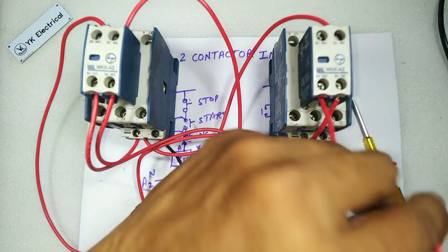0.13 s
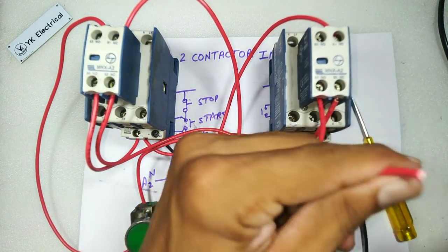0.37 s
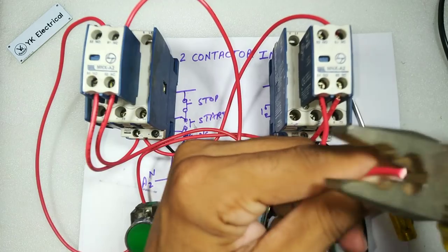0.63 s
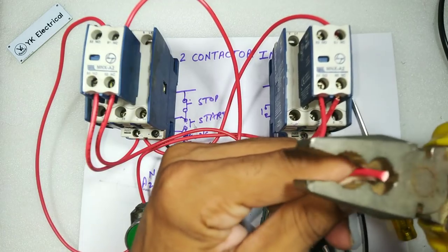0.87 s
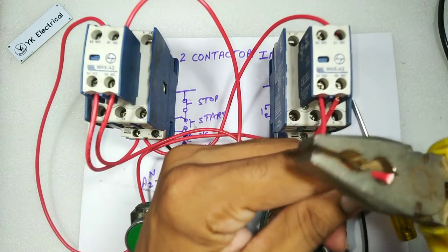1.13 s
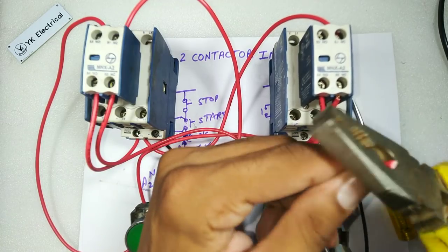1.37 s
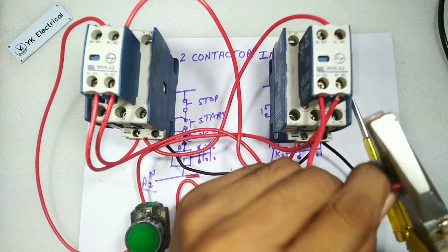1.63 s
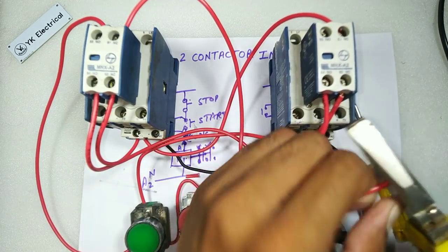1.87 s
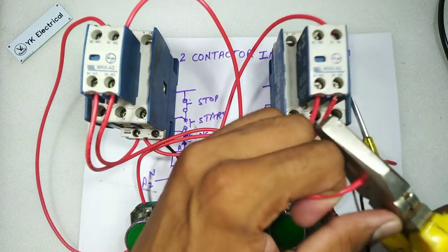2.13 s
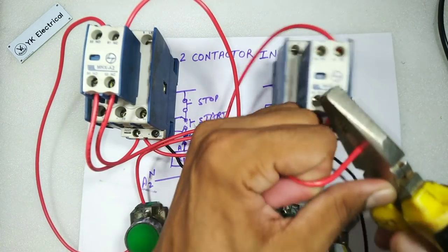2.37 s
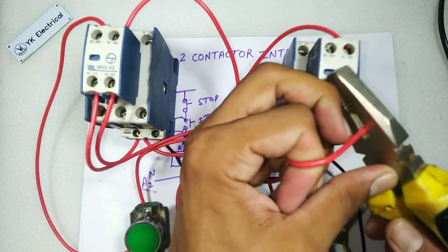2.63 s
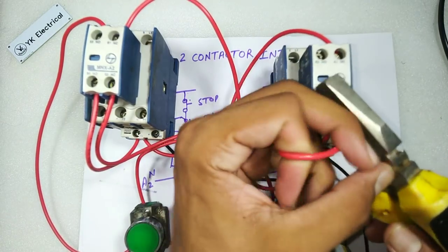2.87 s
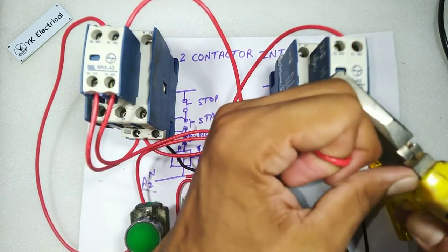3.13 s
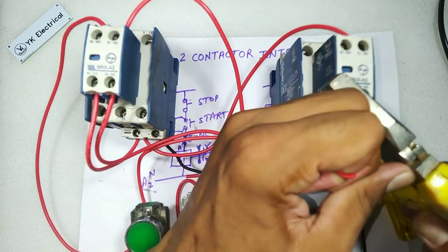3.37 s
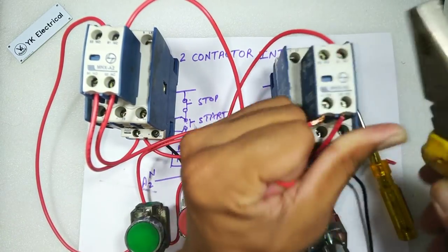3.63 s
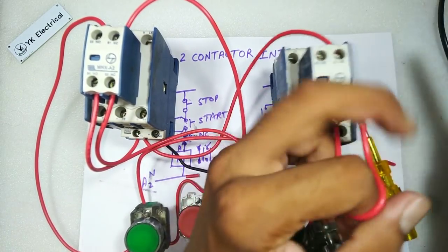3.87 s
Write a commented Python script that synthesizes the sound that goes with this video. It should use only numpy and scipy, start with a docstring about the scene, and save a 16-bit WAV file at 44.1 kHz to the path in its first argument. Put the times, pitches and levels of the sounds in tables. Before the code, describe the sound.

Pliers strip a wire at a table: soft rubbing and small plastic taps build, then a brief creak and one loud steel snap, followed by light clicks. Close stereo microphones, small humming room.

```python
"""Pliers strip a wire close to a pair of microphones: the sleeve creaks, tears off and the jaws snap shut.
The creak is a train of uneven slips, the tear is a burst of grains and noise, and the jaws ring as steel.
A plastic block rubs over paper as showers of tiny impacts and rings when knocked; the table shakes in low modes.
Behind it are room echoes, shaped noise for the quiet air, wavering hum tones and a far cricket of throbbing noise."""
import sys
import numpy as np
from scipy import signal
from scipy.fft import rfft, irfft
from scipy.io import wavfile
from scipy.ndimage import uniform_filter1d

SR = 44100
rng = np.random.default_rng(int(sys.argv[2]) if len(sys.argv) > 2 else 0)


def to_wav(s):
    """Save 16-bit WAV."""
    ch = np.atleast_2d(s).T  # columns
    pcm = np.round(np.clip(ch, -1, 1) * 32767)  # PCM
    wavfile.write(sys.argv[1], SR, pcm.astype(np.int16))


def linear_from_db(decibels):
    """Turn decibels (scalar or array-like) into linear amplitude factors; 0 gives 1."""
    return 10 ** (np.asarray(decibels, float) / 20)


N = 176400  # length of the scene [samples]

# sleeve creaking under load: (time [s], slip rate [1/s], level [dB])
CREAK_PATH = [(3.40, 530, -82), (3.415, 480, -55), (3.445, 480, -57.5), (3.468, 556, -49), (3.51, 585, -53),
              (3.61, 560, -68.5)]
# resonances that follow the creak: (multiple of the slip rate [1], width [Hz], relative level [dB])
CREAK_MODES = [(1.15, 400, -4), (2, 200, -2), (3.95, 300, -1), (4.7, 500, -7)]
# colour of the tearing sleeve: (frequency [Hz], relative level per Hz [dB])
TEAR_COLOUR = [(300, -19), (1400, -29), (3700, -8), (7500, -54), (11000, -17), (16000, -40)]
# contacts of the steel jaws: (time [s], level [dB], brightest pitch [Hz])
JAW_CONTACTS = [(.281, -26.5, 5960), (2.371, -27, 5500), (3.6115, -22, 1500), (3.6125, -2, 3000),
                (3.6185, -15, 880), (3.6201, -2, 1400), (3.6212, 1, 2200), (3.6232, 0, 3600),
                (3.6205, -13, 10500), (3.6243, -9, 5600), (3.6285, -11, 2900), (3.637, -16, 1500),
                (3.641, -9, 3700), (3.658, -30, 3000), (3.753, -24, 3300), (3.822, -23.5, 3280),
                (3.8225, -22.5, 11700), (3.867, -21.5, 9700), (3.871, -23.5, 4460), (3.917, -25, 9000)]
# ringing modes of the pliers: (frequency [Hz])
PLIERS_MODES = [750, 915, 1290, 1480, 1850, 2200, 2480, 2730, 3375, 3790, 4600, 5600, 6500, 9000, 11000,
                14000]
# strokes of the block and wires over paper:
# (start [s], length [s], pressure level [dB], paper hiss relative to it [dB])
STROKES = [(0.187, 0.23, -66.5, -11), (1.811, 0.09, -59.5, -18), (2.282, 0.11, -56.5, -16),
           (2.384, 0.045, -58, -12), (2.416, 0.079, -49.5, -13), (2.479, 0.041, -47.5, -13),
           (2.549, 0.063, -51, -14), (2.612, 0.13, -51, -10.5), (2.692, 0.14, -45.5, -12.5),
           (2.817, 0.094, -54, -17), (2.938, 0.1, -57, -13), (3.01, 0.24, -62.5, -13),
           (3.629, 0.16, -50, -12), (3.763, 0.24, -53, -10)]
# colour of the rubbing heard through the block: (frequency [Hz], relative level per Hz [dB])
BLOCK_COLOUR = [(300, -0.5), (950, 0), (1300, -5), (1900, -2.5), (4000, -3), (8500, -24)]
# colour of the paper hiss: (frequency [Hz], relative level per Hz [dB])
PAPER_COLOUR = [(7500, -31), (10000, -4), (12000, -6), (16000, -12)]
# knocks of the plastic block: (time [s], level [dB], brightest pitch [Hz])
BLOCK_KNOCKS = [(.218, -35, 1360), (1.835, -36, 1270), (1.856, -35, 1270), (1.866, -39, 1510),
                (2.196, -39, 1330), (2.399, -28, 1460), (2.459, -29, 3950), (2.503, -29.5, 3630),
                (2.575, -37.5, 906), (3.074, -36, 1400), (3.272, -38, 930), (3.848, -33, 1400),
                (3.88, -34, 730), (3.94, -39, 1350), (3.98, -39, 1360)]
# ringing modes of the block: (frequency [Hz])
BLOCK_MODES = [730, 880, 1270, 1510, 3000, 4320]
# table shaken by the hands: (time [s], level [dB])
TABLE_SHAKE = [(0, -53.5), (1.9, -65), (2.45, -51.5), (2.6, -45), (3.25, -45.5), (3.5, -57.5), (3.61, -47),
               (3.64, -35.5), (3.8, -41), (4, -51.5)]
# low modes of the table: (frequency [Hz], width [Hz], relative level [dB])
TABLE_MODES = [(60.5, 40, -0.5), (81.8, 16.4, -2), (206.4, 44, -13)]
# how fast the room's echo dies: (frequency [Hz], time to fall 60 dB [s])
ECHO_DECAY = [(200, 0.82), (1000, 0.36), (5000, 0.41), (12000, 0.33)]
# wavering hum tones: (frequency [Hz], level [dB], width of the wavering part [Hz])
HUM_TONES = [(100.9, -51.5, 4.7), (171.4, -57.5, 0.55)]
# colour of the room noise: (frequency [Hz], relative level per Hz [dB])
AIR_COLOUR = [(35, -24), (75, 0.5), (130, -7.5), (200, -7.5), (270, -17), (520, -21.5), (700, -27),
              (4000, -36), (7500, -45), (10500, -42), (16000, -42)]
# how alike the room noise is left and right: (frequency [Hz], likeness [0 to 1])
AIR_LIKENESS = [(200, 0.87), (950, 0), (2000, 0)]


def evened(x):
    """Scales a signal to an average strength (rms) of 1."""
    return x / np.sqrt(np.mean(x ** 2) + 1e-20)


def read(points, hz):
    """Reads a frequency table between its points, on a logarithmic pitch axis."""
    f, value = np.transpose(points)
    return np.interp(np.log(hz + 1), np.log(f + 1), value)


def curve(rows, col, outside):
    """Spreads one column of a table along the whole time axis."""
    rows = np.array(rows)
    return np.interp(np.arange(N) / SR, rows[:, 0], rows[:, col], outside, outside)


def hump(start_s, length_s):
    """Progress through an event: 0 before it, rising to 1 at its end."""
    return np.clip((np.arange(N) / SR - start_s) / length_s, 0, 1)


def colour(x, points):
    """Shapes a spectrum, silent beyond the ends of the table, and evens it to rms 1."""
    hz = np.fft.rfftfreq(x.shape[-1], 1 / SR)
    inside = (hz > points[0][0]) * (hz < points[-1][0])
    return evened(irfft(rfft(x) * linear_from_db(read(points, hz)) * inside, x.shape[-1]))


def resonate(x, hz, width_hz):
    """A resonance of gain 1, fixed or moving: shift its pitch to zero, smooth, shift back."""
    turn = np.exp(2j * np.pi * np.cumsum(hz * np.ones(N)) / SR)
    r = np.exp(-np.pi * width_hz / SR)
    return 2 * (turn * signal.lfilter([1 - r], [1, -r], x / turn)).real


def resonate_twice(x, hz, width_hz):
    """Two equal resonances in a row leave a narrower band."""
    return resonate(resonate(x, hz, width_hz), hz, width_hz)


def grains():
    """Sliding contact: dense tiny impacts of uneven size at random moments."""
    grains_per_s, spread_db = 6000, 4.5
    size = linear_from_db(spread_db * np.minimum(rng.exponential(1, N), 3)) * rng.standard_normal(N)
    return size * (rng.random(N) < grains_per_s / SR)


def creak():
    """The sleeve sticks and slips unevenly; resonances at multiples of the slip rate sound."""
    jitter, noise_amount = 0.07, 1.1
    pace = curve(CREAK_PATH, 1, 500)
    rate = pace * (1 + jitter * evened(uniform_filter1d(rng.standard_normal(N), 150)))
    slips = np.diff(np.floor(np.cumsum(rate) / SR), prepend=0)  # one click per finished cycle
    slips = slips * linear_from_db(3.3 * rng.standard_normal(N))
    drive = evened(slips - slips.mean()) + noise_amount * rng.standard_normal(N)
    sound = sum(linear_from_db(db) * resonate_twice(drive, k * pace, w) for k, w, db in CREAK_MODES)
    return linear_from_db(curve(CREAK_PATH, 2, -120)) * evened(sound)


def tear():
    """The sleeve scrapes through the jaws as it tears: a short rasp of grains and noise."""
    start_s, length_s, level_db = 3.6105, 0.034, -33
    t = np.arange(N) / SR - start_s
    rasp = np.clip(t / 0.0022, 0, 1) * np.clip((length_s - t) / 0.0028, 0, 1)
    return linear_from_db(level_db) * rasp * colour(evened(grains()) + rng.standard_normal(N), TEAR_COLOUR)


def blows(rows, modes, q, contact_s):
    """Each blow rings the modes nearest its brightest pitch and starts with a short crack."""
    focus_db_per_oct2 = -24  # modes weaken with squared distance in octaves
    crack_db, crack_s, crack_db_per_oct = -15, 0.0015, -9
    out, t = np.zeros(N + 2048), np.arange(2048) / SR
    hz = np.array(modes)[:, None]
    all_hz = np.fft.rfftfreq(2048, 1 / SR) + 1
    for s, level_db, top_hz in rows:
        detune, noise = rng.standard_normal((len(modes), 1)), rng.standard_normal(2048)
        strength = linear_from_db(focus_db_per_oct2 * np.log2(hz / top_hz) ** 2)
        decay = np.exp(-np.pi * hz / q * t)
        ring = (strength * decay * np.sin(2 * np.pi * hz * (1 + 0.0028 * detune) * t)).sum(0)
        crack_colour = linear_from_db(crack_db_per_oct * abs(np.log2(all_hz / top_hz)))
        crack = evened(irfft(rfft(noise) * crack_colour)) * np.exp(-t / crack_s)
        blow = ring / abs(ring).max() + linear_from_db(crack_db) * crack
        blow *= 1 - np.exp(-t / contact_s)  # a softer contact starts more slowly
        at = round(s * SR)
        out[at:at + len(blow)] += linear_from_db(level_db) * blow
    return out[:N]


def jaws():
    """Hard steel contacts ring the many modes of the pliers; q is pitch over width of a mode."""
    return blows(JAW_CONTACTS, PLIERS_MODES, q=9, contact_s=0.0003)


def knocks():
    """Softer plastic contacts ring the few modes of the block."""
    return blows(BLOCK_KNOCKS, BLOCK_MODES, q=14, contact_s=0.0007)


def squeak():
    """A thin squeak: sliding grains through one narrow high resonance."""
    start_s, length_s, hz, level_db = 2.64, 0.17, 11460, -57
    swell = np.sin(np.pi * hump(start_s, length_s))
    return linear_from_db(level_db) * swell * evened(resonate_twice(grains(), hz, 500))


def drag():
    """Rubbing: friction grains through the block plus paper hiss, swelling and fading with each stroke."""
    catch_db, scrape_hz, scrape_db = 3.5, 1400, -3
    pressure, hiss = np.zeros(N), np.zeros(N)
    for start_s, length_s, db, hiss_db in STROKES:
        stroke = linear_from_db(db) * np.sin(np.pi * hump(start_s, length_s) ** 1.13) ** 0.85
        pressure += stroke
        hiss += stroke * linear_from_db(hiss_db)
    # the block catches unevenly; its hollow rings at a wandering pitch
    catch = evened(uniform_filter1d(rng.standard_normal(N), 200))
    wander = evened(uniform_filter1d(rng.standard_normal(N), 4000))
    rubbing = grains()
    hollow = evened(resonate(rubbing, scrape_hz * (1 + 0.071 * wander), 350))
    body = colour(rubbing, BLOCK_COLOUR) + linear_from_db(scrape_db) * hollow
    return squeak() + pressure * evened(linear_from_db(catch_db * catch) * body) + hiss * colour(grains(), PAPER_COLOUR)


def table():
    """Hands stir the low modes of the table with noise; a decaying low tone thumps as the jaws close."""
    thump_s, thump_db, thump_hz, thump_t60_s = 3.6275, -28, 85, 0.11
    push = rng.standard_normal((2, N))
    push = push[0] + 0.5 * push[1] * np.array([[1], [-1]])  # partly shared by left and right
    low = sum(linear_from_db(db) * resonate_twice(push, hz, w) for hz, w, db in TABLE_MODES)
    t = np.maximum(np.arange(N) / SR - thump_s, 0)
    thump = linear_from_db(thump_db - 60 * t / thump_t60_s) * np.sin(-2 * np.pi * thump_hz * t)
    thump *= np.minimum(t / 0.0021, 1)  # soft start
    return linear_from_db(curve(TABLE_SHAKE, 1, -60)) * evened(low) + thump


def room(x):
    """Sparse echoes of random sign: quick ones from the table and a tail dying band by band."""
    tail_db, early_db, early_t60_s = -8.5, -12, 0.05
    taps = np.zeros((2, SR))
    at = np.arange(60, SR - 20, 20) + rng.integers(0, 20, (2, (SR - 61) // 20))
    np.put_along_axis(taps, at, rng.choice([-1., 1.], at.shape), 1)
    early = taps * linear_from_db(-60 * np.arange(SR) / SR / early_t60_s)
    hz, t, z = signal.stft(taps, SR, nperseg=256)
    z = z * linear_from_db(-60 * t / read(ECHO_DECAY, hz)[:, None])
    tail = signal.istft(z, SR, nperseg=256)[1][:, :SR]
    echoes = linear_from_db(tail_db) * tail / np.linalg.norm(tail[0])
    echoes += linear_from_db(early_db) * early / np.linalg.norm(early[0])
    return signal.fftconvolve(x[None], echoes, axes=1)[:, :N]


def hum():
    """Steady tones mixed with narrow noise at the same pitch, so their strength wavers."""
    t, out = np.arange(N) / SR, np.zeros(N)
    for hz, db, width_hz in HUM_TONES:
        waver = evened(resonate_twice(rng.standard_normal(N), hz, width_hz))
        steady = np.sin(2 * np.pi * (hz * t + rng.random()))
        out += linear_from_db(db) * evened(steady + 0.49 * waver)
    return out


def room_noise():
    """Air noise: random short-time spectra with faint patches, alike left and right only in the bass."""
    level_db, patch_db = -50, 1.66
    frames, hz = N // 512 + 5, np.fft.rfftfreq(2048, 1 / SR)
    a, b, c, d, patches = rng.standard_normal((frames, 1025, 5)).T
    patches = evened(uniform_filter1d(uniform_filter1d(patches, 6, 0), 8, 1))
    same = np.clip(read(AIR_LIKENESS, hz), -1, 1)[:, None]
    left = a + 1j * b
    right = same * left + np.sqrt(1 - same ** 2) * (c + 1j * d)
    z = np.array([left, right]) * linear_from_db(read(AIR_COLOUR, hz)[:, None] + patch_db * patches)
    z *= hz[:, None] > AIR_COLOUR[0][0]
    return linear_from_db(level_db) * evened(signal.istft(z, nperseg=2048, noverlap=1536)[1][:, :N])


def cricket():
    """Soft chirps at even intervals: narrow noise throbs around one pitch, blurred by distance."""
    hz, level_db = 3890, -74
    first_s, every_s, chirp_s = -0.061, 0.317, 0.1
    on = sum(np.sin(np.pi * hump(s, chirp_s)) for s in np.arange(first_s, N / SR, every_s))
    return linear_from_db(level_db) * on * evened(resonate_twice(rng.standard_normal((2, N)), hz, 40))


def scene():
    """The pliers work to the right, so the left hears them later and softer; the rubbing is spread wide."""
    left_lag_s, left_db = 0.0002, -3.5
    near = creak() + tear() + jaws() + knocks()
    lag = np.exp(-2j * np.pi * np.fft.rfftfreq(N, 1 / SR) * left_lag_s)
    late = irfft(rfft(near) * lag, N)
    rub = np.array([drag(), drag()])
    direct = np.array([linear_from_db(left_db) * late, near]) + rub
    background = table() + hum() + room_noise() + cricket()
    return direct + room(near + rub[1]) + background


def roll_off(x):
    """The treble ends steeply here."""
    return signal.sosfilt(signal.butter(12, 15300, fs=SR, output="sos"), x)


def record(dry):
    """The microphones lose the deepest bass and the top treble."""
    low_cut_hz, top_cut_hz = 35, 15800
    band = signal.butter(N=4, Wn=[low_cut_hz, top_cut_hz], btype="band", fs=SR, output="sos")
    mix = signal.sosfilt(band, dry)
    return roll_off(mix)


dry = scene()
out = record(dry)
to_wav(out)
```